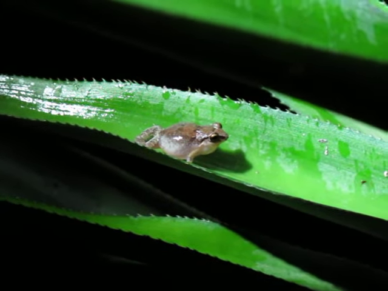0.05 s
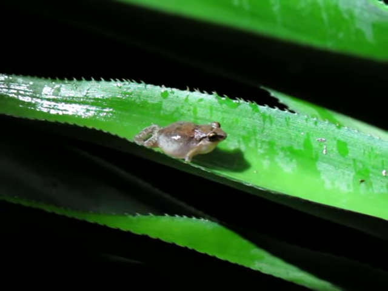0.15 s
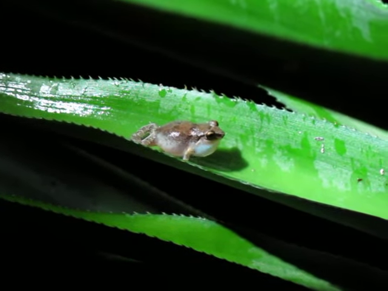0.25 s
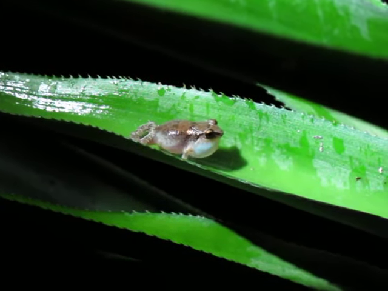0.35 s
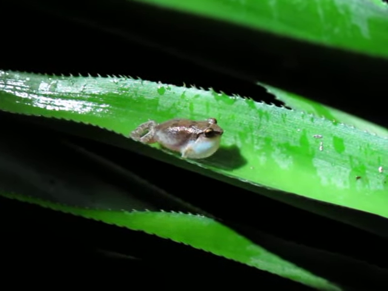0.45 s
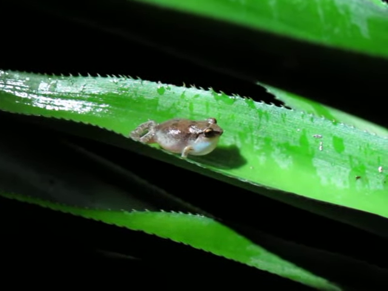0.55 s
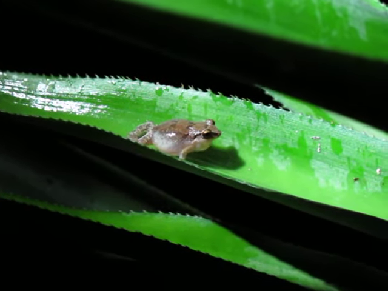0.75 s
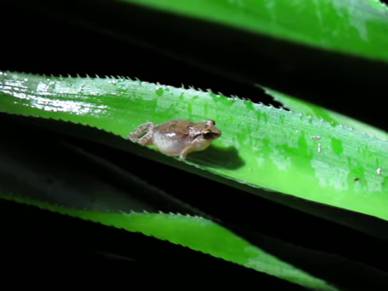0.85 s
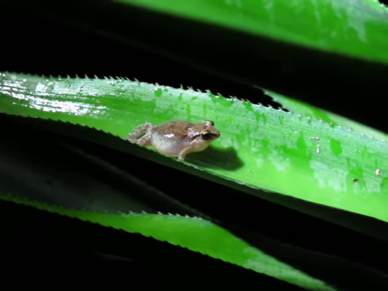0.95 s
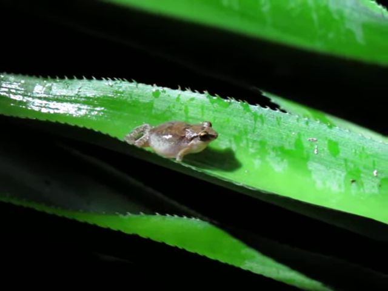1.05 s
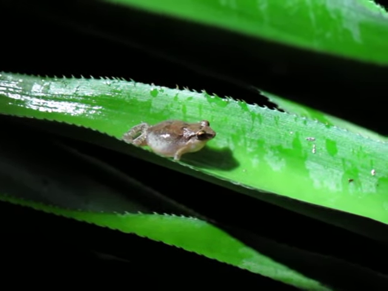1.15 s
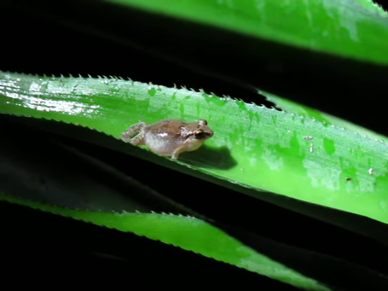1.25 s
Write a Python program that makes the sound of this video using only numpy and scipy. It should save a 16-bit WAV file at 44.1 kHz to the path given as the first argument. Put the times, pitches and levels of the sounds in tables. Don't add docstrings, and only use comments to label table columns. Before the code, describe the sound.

A tiny tree frog, close and loud, calls once: a pure low whistle near 1.9 kHz from 0.22 to 0.28 seconds snaps up to about 3.5 kHz, held until 0.45. Throughout 1.3 seconds, crickets trill steadily around 7 kHz, with a fainter lower trill, over blurred distant frog peeps and insect shimmer. Faint leaf rustles come near 0.75 and 0.95, a tap near 1.2. Mono, slight hiss and hum.

```python
import sys
import numpy as np
from scipy import signal
from scipy.fft import rfft, irfft
from scipy.io import wavfile
from scipy.ndimage import uniform_filter1d

SR = 44100
rng = np.random.default_rng(int(sys.argv[2]) if len(sys.argv) > 2 else 0)


def transcribe(signal):
    frames = np.atleast_2d(signal).T
    limited = np.clip(frames, -1, 1)
    pcm = np.round(limited * 32767).astype(np.int16)
    wavfile.write(sys.argv[1], SR, pcm)


def undo_db(level):
    steps = np.asarray(level, float) / 20
    return 10 ** steps


N = 57330
T = np.arange(N) / SR

# time in seconds, pitch in Hz.
CRICKET_A = [(0, 6840), (.15, 6840), (.55, 6833), (.8, 6837), (1, 6842), (1.17, 6844), (1.3, 6858)]
CRICKET_B = [(0, 7409), (.3, 7404), (.6, 7397), (1.3, 7392)]
CRICKET_C = [(0, 6955), (.64, 6948), (.9, 6940), (1.3, 6922)]
CRICKET_D = [(0, 4772), (0.602, 4716), (1.3, 4740)]
OVERTONE_NUMBERS = (50, 55, 52, 40)
# centre in Hz, width in Hz, level at start in dB, level at end in dB, echo delay in ms.
WINGS = [
    (7061, 626, -33.5, -35.5, 2.9),
    (7305, 400, -35.5, -45.5, 3.4),
    (6866, 300, -56, -37, 1.9),
    (4787, 750, -46, -50.5, 4.3),
]
# centre in Hz, width in Hz, level in dB, throbs
FAR_HAZE = [
    (1990, 230, -56, 11, .3),
    (3570, 620, -49.5, 9, .2),
    (7100, 950, -47, 135, .3),
    (4850, 600, -47, 45, .15),
    (5850, 600, -53, 30, .3),
    (8450, 400, -66, 20, .2),
    (10800, 3500, -59, 8, .2),
    (14500, 2000, -72, 8, .2),
]
# middle in seconds, length in seconds, centre in Hz, width in Hz, level in dB.
RUSTLES = [
    (.95, .05, 9300, 700, -52),
    (.97, .05, 10800, 3000, -58),
    (.75, .025, 9500, 3000, -58),
    (.479, .0012, 9500, 3000, -54),
    (1.208, .007, 3200, 700, -50),
    (.2235, .002, 3000, 3000, -42),
]
# frequency in Hz, density in dB per Hz.
AIR_COLOUR = [(20, 0.5), (60, -1), (150, -11.5), (400, -13.5), (1200, -25.5), (2700, -27), (9000, -25.5),
              (15500, -50.5)]
# start in seconds, length in seconds, pitch in Hz, level in dB.
FAR_HIGH_NOTES = [(-.04, .17, 3697, -46.5), (-.03, .18, 3880, -52), (.01, .17, 3250, -47),
                  (.15, .22, 3247, -46.5), (.07, .1, 3405, -48), (.45, .2, 3340, -50), (.43, .1, 3947, -50),
                  (.56, .15, 3945, -58), (.69, .19, 3512, -48), (.85, .18, 3332, -46),
                  (.89, .12, 3150, -58), (.96, .17, 3790, -46), (1.07, .03, 3322, -49),
                  (1.14, .18, 3870, -52), (1.22, .06, 3500, -44), (1.14, .17, 3250, -57),
                  (.9, .08, 3600, -54), (1.26, .1, 3590, -48)]
# start in seconds, length in seconds, pitch in Hz, level in dB.
FAR_LOW_NOTES = [(0, .08, 1910, -55), (.04, .09, 2005, -50), (.12, .08, 1960, -55), (.53, .08, 1975, -53),
                 (.73, .09, 1890, -55), (.9, .08, 2030, -55), (1.07, .08, 2150, -57),
                 (1.13, .08, 1990, -52)]
# time in seconds, pitch in Hz, then levels in dB of the fundamental
LOW_NOTE = [
    (.2205, 1880, -50, -50, -62, -75),
    (.2238, 1915, -29, -36, -54, -64),
    (.2256, 1932, -17.5, -37, -45, -52),
    (.229, 1935, -14, -37.5, -41, -46),
    (.246, 1935, -13.8, -38, -39, -40),
    (.249, 1935, -14, -37, -41, -51),
    (.277, 1936, -15.4, -31, -43, -56),
    (.2822, 2005, -20, -19.5, -50, -66),
    (.287, 1985, -34, -37, -66, -75),
]
# time in seconds, pitch in Hz, level in dB.
HIGH_NOTE = [
    (.2805, 2850, -38),
    (.284, 3134, -16.5),
    (.289, 3360, -15.3),
    (.301, 3500, -13.5),
    (.34, 3563, -13.1),
    (.433, 3522, -13.2),
    (.4435, 3545, -14.8),
    (.453, 3505, -29),
    (.461, 3540, -35),
]
# time in seconds, change in dB.
GAIN_STEPS = [(.2957, -.75), (.3016, -.75), (.3098, -.75), (.3128, -.75), (.3166, -.75), (.3453, -.75),
              (.375, -.75)]


def level(x, db):
    return x * undo_db(db) / np.sqrt(np.mean(x ** 2))


def shaped(x, gain):
    return irfft(rfft(x) * gain(np.arange(N // 2 + 1) * SR / N + 1e-3), N)


def resonance(f, hz, width):
    return np.exp(-2 * ((f - hz) / width) ** 2)


def band(hz, width):
    return level(shaped(rng.standard_normal(N), lambda f: resonance(f, hz, width)), 0)


def walk(rate):
    n = N // 64 + 1
    f = np.arange(n // 2 + 1) * SR / N
    slow = irfft(rfft(rng.standard_normal(n)) / (1 + (f / rate) ** 2) * (f > 0), n)
    return np.interp(T, np.linspace(0, T[-1], n), slow / slow.std())


def bell(mid, length):
    return np.exp(-.5 * ((T - mid) / length) ** 2)


def tail(x, t60, db):
    t = T[:int(t60 * SR)]
    echoes = rng.standard_normal(N)[:len(t)] * undo_db(-60 * t / t60)
    return x + signal.fftconvolve(x, echoes * undo_db(db) / np.sqrt(np.sum(echoes ** 2)))[:N]


def curve(rows, k):
    rows = np.array(rows, float)
    return np.interp(T, rows[:, 0], rows[:, k])


def turns(hz):
    return 2 * np.pi * np.cumsum(hz) / SR


def cricket(rows, order, hz, width, start_db, end_db, echo_ms):
    second_mode, second_mode_db = 1.185, -25
    echo_db, sweep_ms_per_khz = -7, 1.5
    phase_wander, shimmer_db = .27, 4.5
    stroke_hz = curve(rows, 1) / order
    stroke_phase = turns(stroke_hz)
    song = 0
    for k in range(order - 5, order + 14):
        f = k * stroke_hz.mean()
        wing = resonance(f, hz, width) + undo_db(second_mode_db) * resonance(f, second_mode * hz, width)
        heard = wing * (1 + undo_db(echo_db) * np.exp(-2j * np.pi * f * echo_ms / 1000))
        sweep = np.pi * sweep_ms_per_khz * ((f - hz) / 1000) ** 2
        phase = k * stroke_phase + np.angle(heard) - sweep + phase_wander * walk(10)
        song = song + abs(heard) * np.cos(phase) * undo_db(shimmer_db * walk(1))
    return level(song, 0) * undo_db(start_db + (end_db - start_db) * T / T[-1])


def crickets():
    pitches = (CRICKET_A, CRICKET_B, CRICKET_C, CRICKET_D)
    return sum(cricket(rows, order, *wing) for rows, order, wing in zip(pitches, OVERTONE_NUMBERS, WINGS))


def whistle(start, length, hz, db, rise_hz):
    edge_s, rise_s, fade_db = .018, .012, 3
    since = T - start
    envelope = np.clip(np.minimum(since, length - since) / edge_s, 0, 1)
    pitch = hz - rise_hz * np.exp(-np.maximum(since, 0) / rise_s)
    return np.sqrt(2) * envelope * undo_db(db + fade_db * walk(17)) * np.sin(turns(pitch))


def chorus(count=70):
    low_rise_hz, high_rise_hz, wood_t60_s = 30, 220, .4
    near = undo_db(.8) * sum(whistle(*row, high_rise_hz) for row in FAR_HIGH_NOTES)
    near = near + sum(whistle(*row, low_rise_hz) for row in FAR_LOW_NOTES)
    crowd = 0
    for k, (a, b, c) in enumerate(np.clip(rng.standard_normal((count, 3)), -1.6, 1.7)):
        start = 1.6 * (k + .5 * a) / count - .3
        db = -65 + 2.5 * c
        crowd = crowd + whistle(start, .075, 1985 + 72 * b, db, low_rise_hz)
        crowd = crowd + whistle(start, .17, 3570 + 210 * a, db, high_rise_hz)
    return tail(near, wood_t60_s, -12) + tail(crowd, wood_t60_s, 4)


def far_haze():
    haze = 0
    for hz, width, db, rate, depth in FAR_HAZE:
        swell = undo_db(db + walk(3.3))
        haze = haze + swell * band(hz, width) * (1 + depth * np.sin(turns(rate * (1 + .095 * walk(3)))))
    return haze


def rustles():
    return sum(undo_db(db) * bell(mid, length) * band(hz, width) for mid, length, hz, width, db in RUSTLES)


def air_and_hum():
    hz, db = np.array(AIR_COLOUR, float).T
    colour = lambda f: undo_db(np.interp(np.log(f), np.log(hz), db))
    air = level(shaped(rng.standard_normal(N), colour), -49.5)
    hum_hz, hum_db = 100.1, -53.5
    return air + np.sqrt(2) * undo_db(hum_db + .97 * walk(6.5)) * np.sin(2 * np.pi * hum_hz * T)


def gain_db(smooth_s):
    recover_s, recover_len_s = .49, .2
    down = sum(db * (T > s) for s, db in GAIN_STEPS)
    down = down * np.clip(1 - (T - recover_s) / recover_len_s, 0, 1)
    return uniform_filter1d(down, max(int(smooth_s * SR), 1))


def fading(rows, k):
    ring_t60_s, onset_s = .028, .0012
    ring_db = -60 * np.maximum(T - rows[-1][0], 0) / ring_t60_s
    return undo_db(curve(rows, k) + ring_db) * np.clip((T - rows[0][0]) / onset_s, 0, 1)


def frog():
    low_phase = turns(curve(LOW_NOTE, 1))
    high_phase = turns(uniform_filter1d(curve(HIGH_NOTE, 1), size=90))
    low = 0
    for column, partial in ((2, 1), (3, 2), (4, 3), (5, 5)):
        low = low + fading(LOW_NOTE, column) * np.sin(partial * low_phase)
    wobble = undo_db(.18 * walk(39.9))
    high = fading(HIGH_NOTE, 2) * wobble * (np.sin(high_phase) + undo_db(-47) * np.sin(3 * high_phase))
    squeak = undo_db(-30.5) * bell(.4563, .004) * np.sin(2 * np.pi * 4130 * T)
    snap = undo_db(-31) * bell(.2825, .0045) * band(3900, 2600)
    call = tail(np.sqrt(2) * (low + high + squeak) + snap, .08, -34)
    return call * undo_db(-gain_db(.03))


def scene():
    near = frog() + crickets()
    far = chorus() + far_haze()
    return (near + far + rustles() + air_and_hum())[None]


def low_pass(x):
    return signal.sosfilt(signal.butter(12, 15630, fs=SR, output="sos"), x)


def record(dry):
    mix = dry * undo_db(gain_db(.00015))
    return low_pass(mix)


dry = scene()
out = record(dry)
transcribe(out)
```